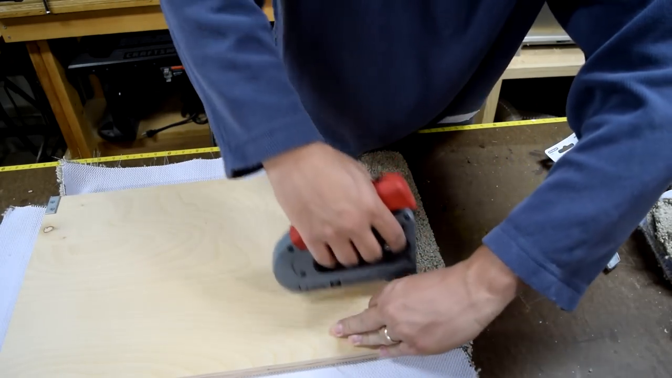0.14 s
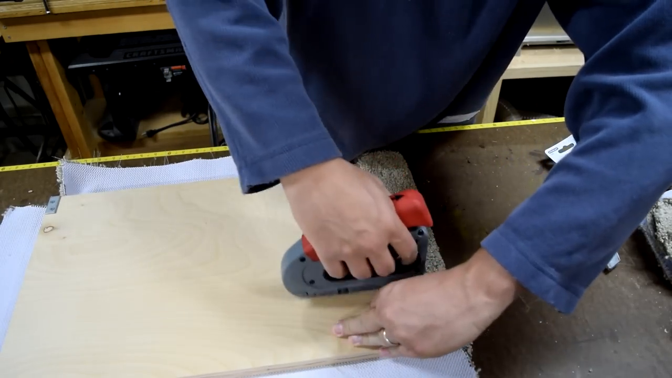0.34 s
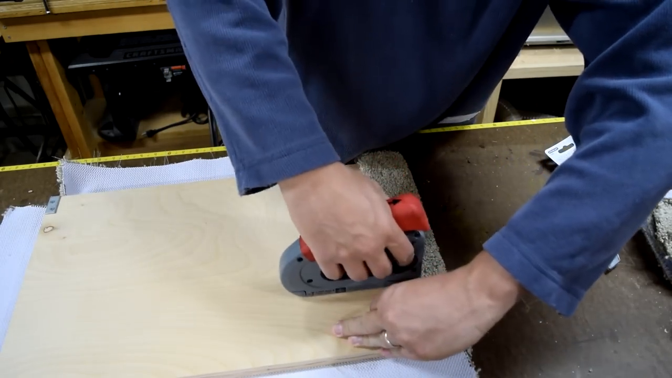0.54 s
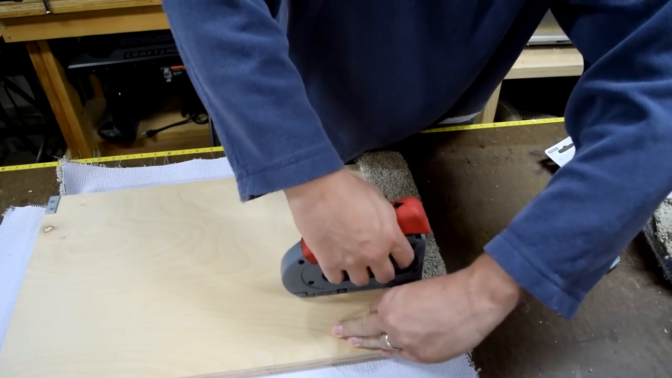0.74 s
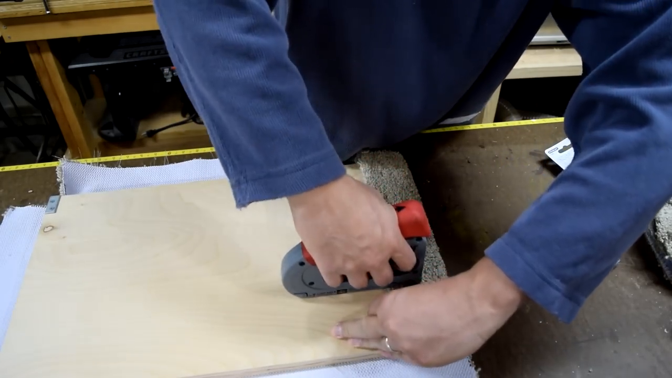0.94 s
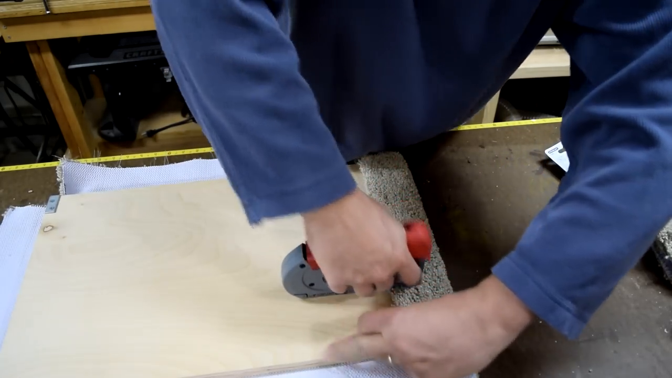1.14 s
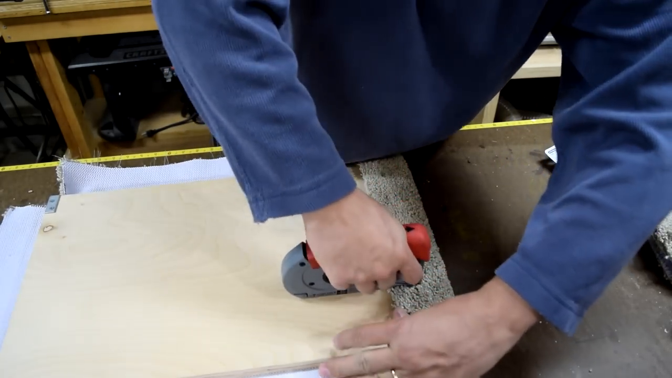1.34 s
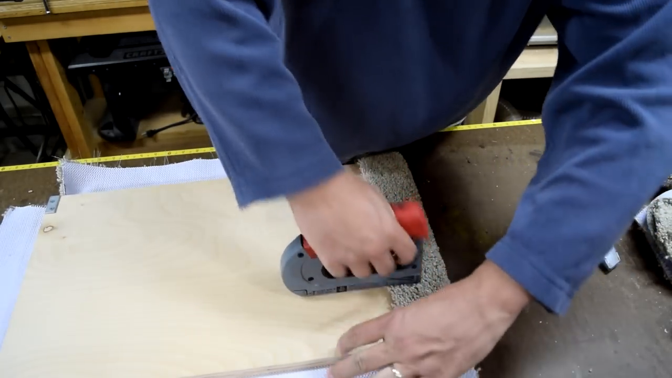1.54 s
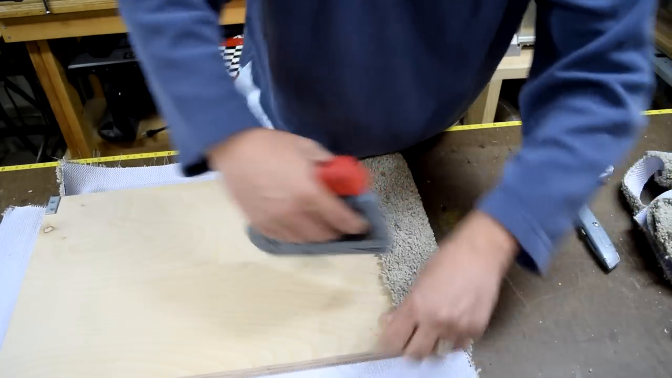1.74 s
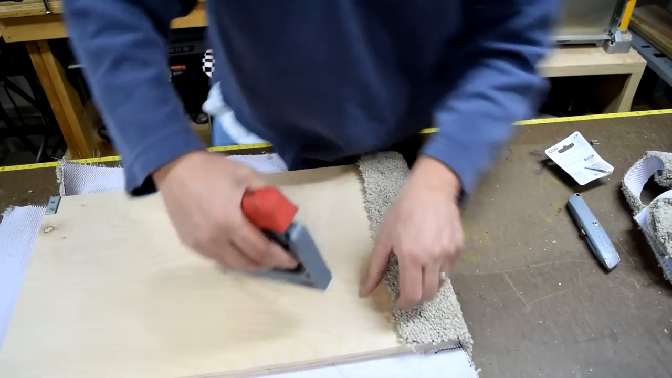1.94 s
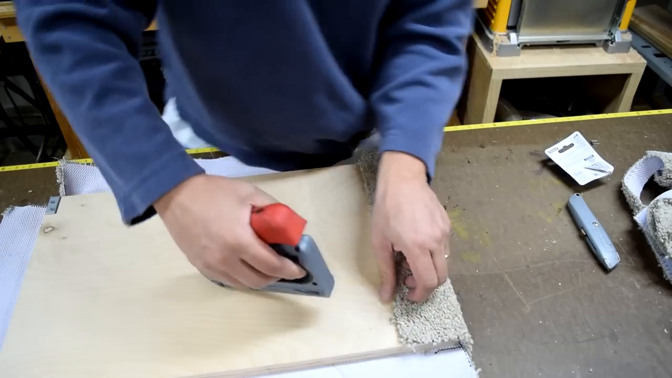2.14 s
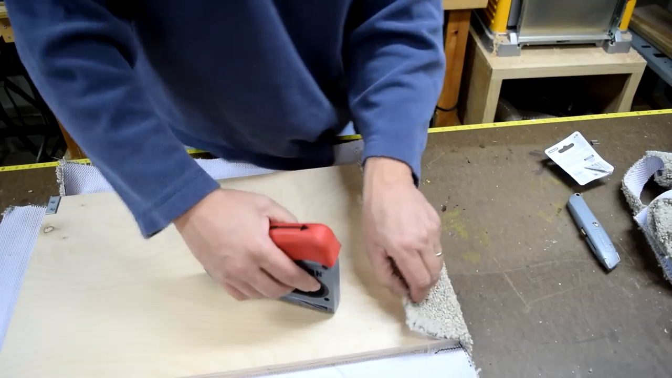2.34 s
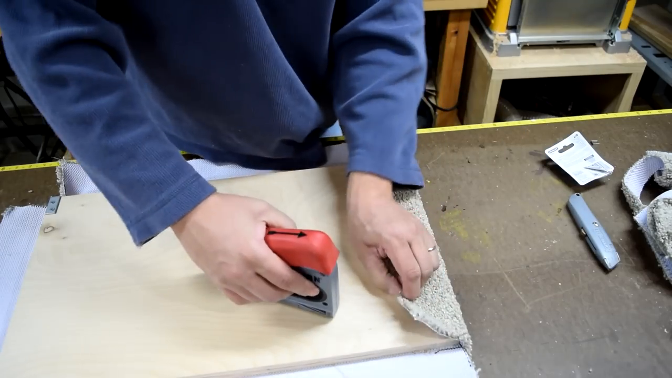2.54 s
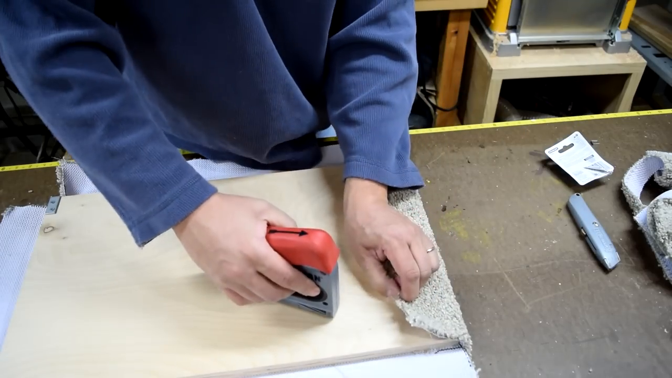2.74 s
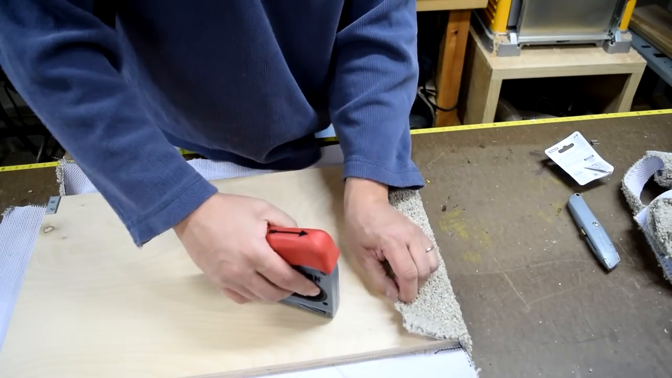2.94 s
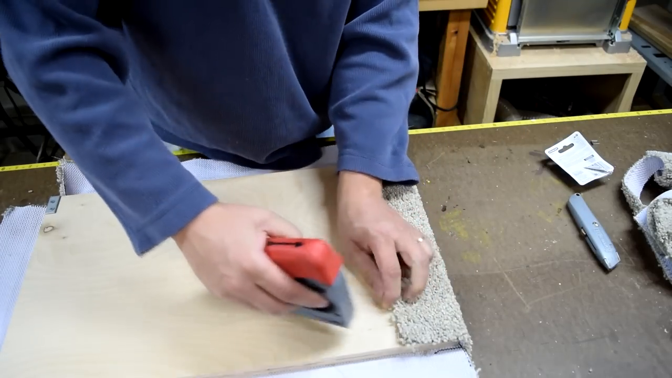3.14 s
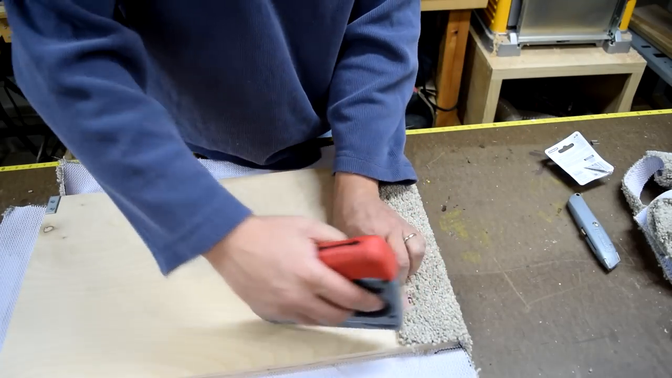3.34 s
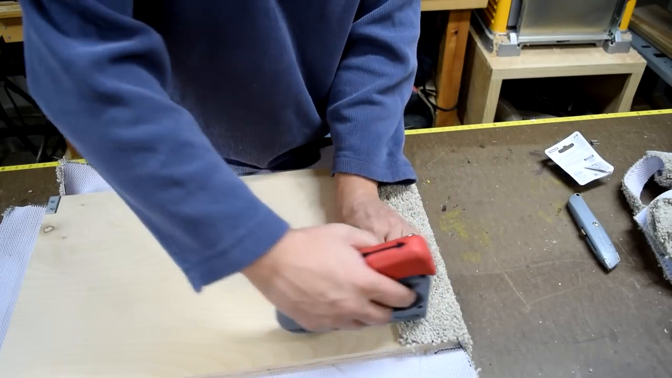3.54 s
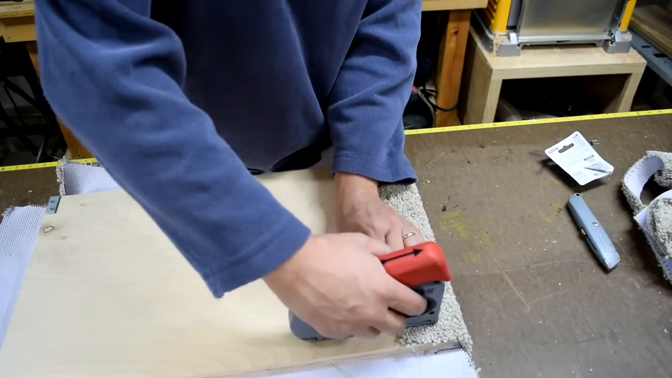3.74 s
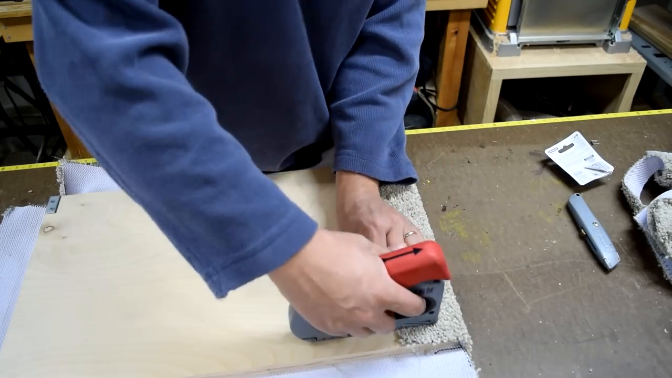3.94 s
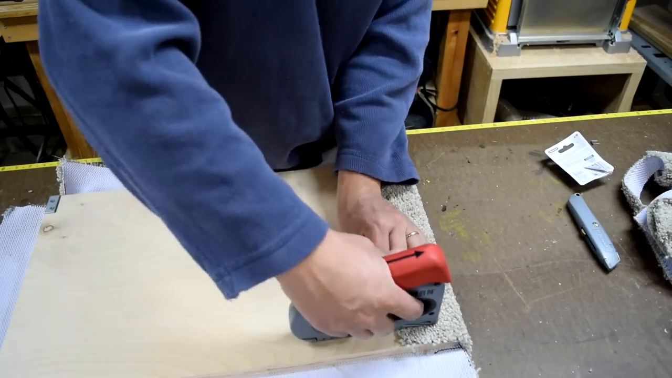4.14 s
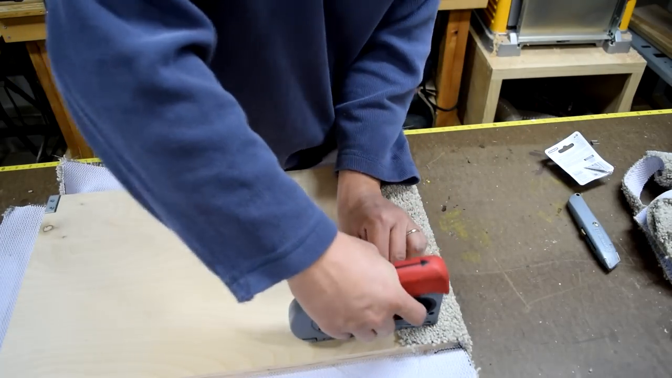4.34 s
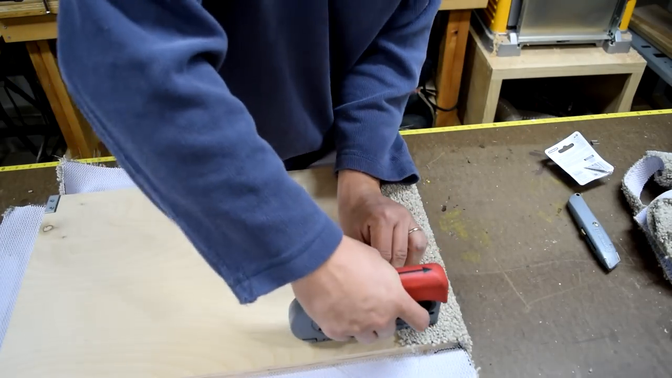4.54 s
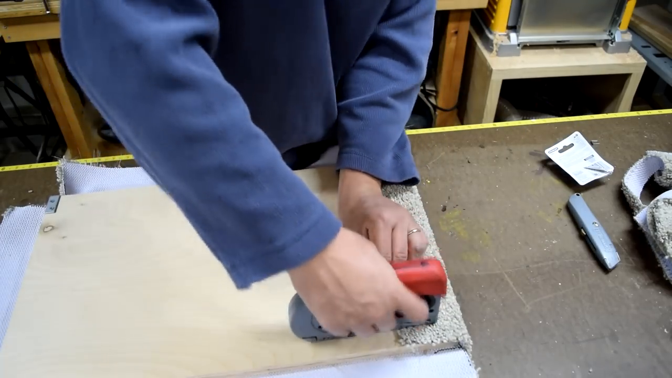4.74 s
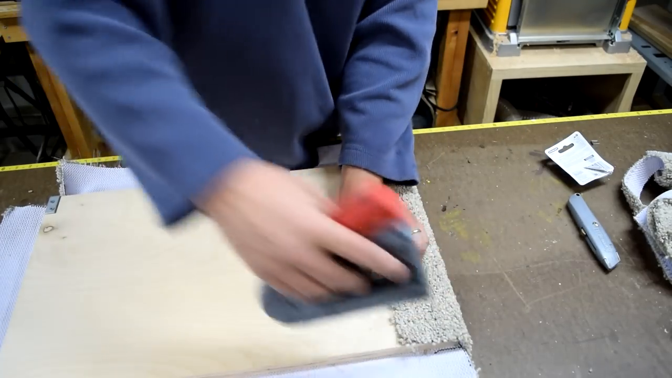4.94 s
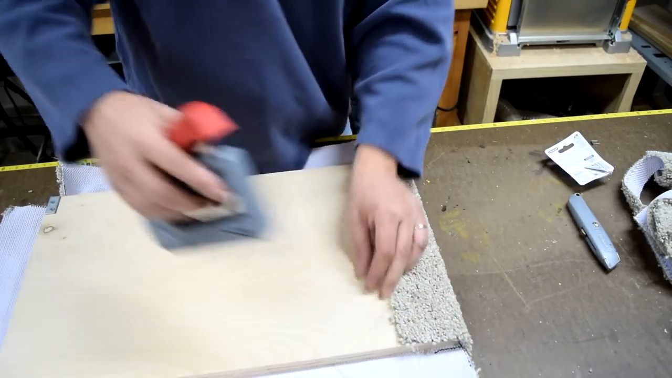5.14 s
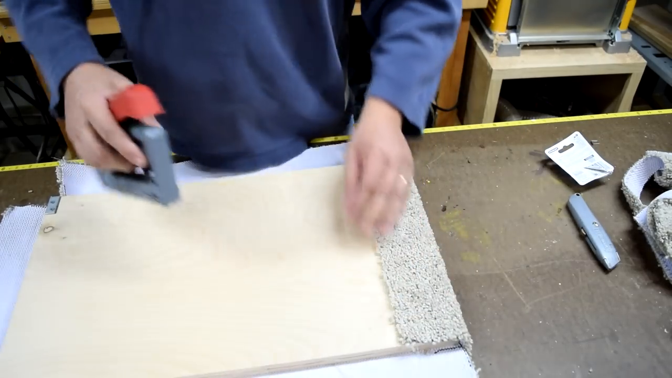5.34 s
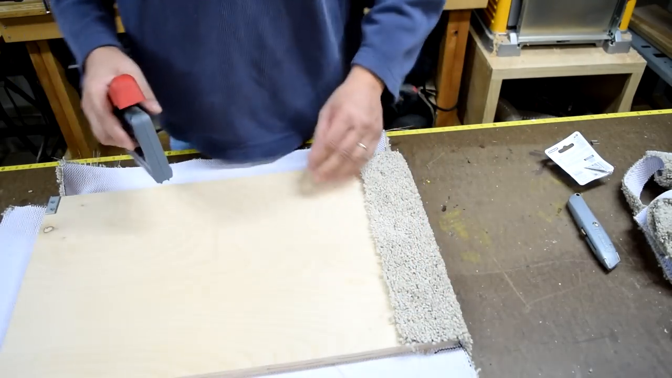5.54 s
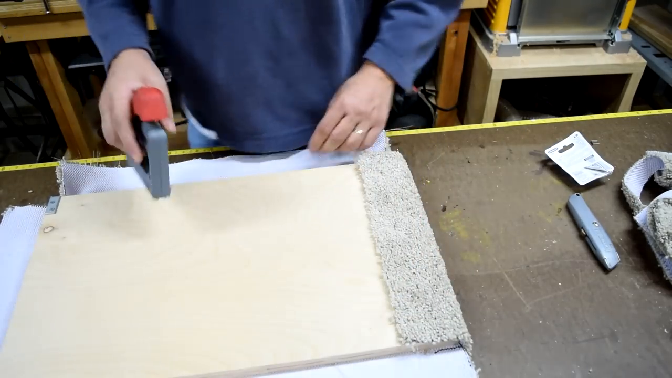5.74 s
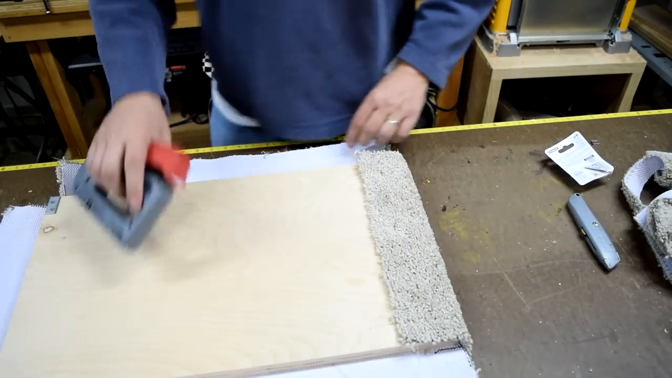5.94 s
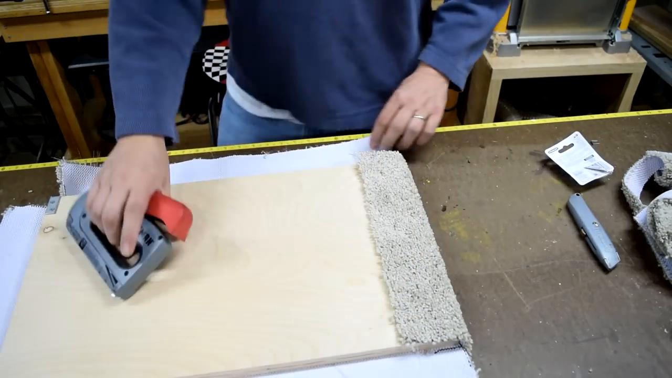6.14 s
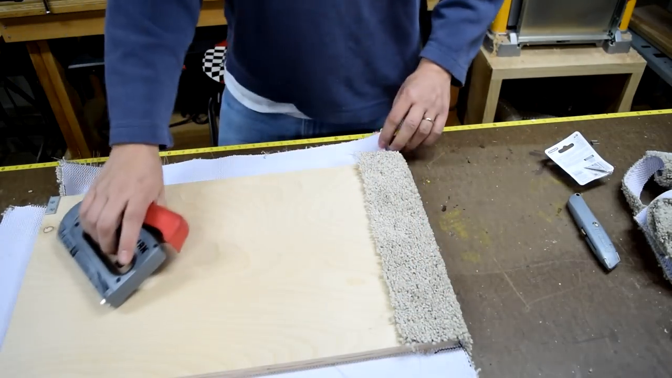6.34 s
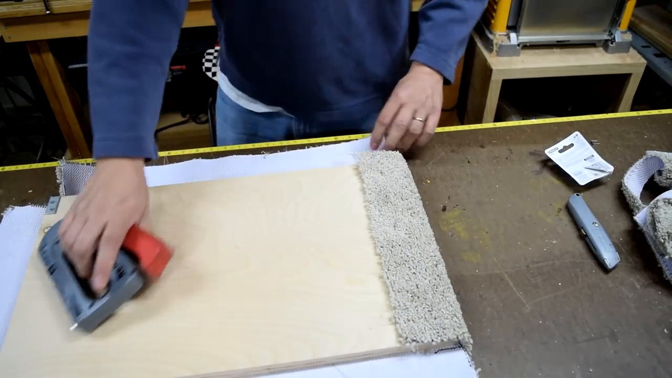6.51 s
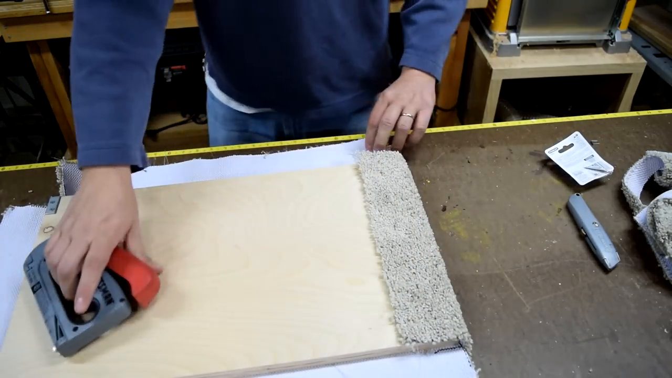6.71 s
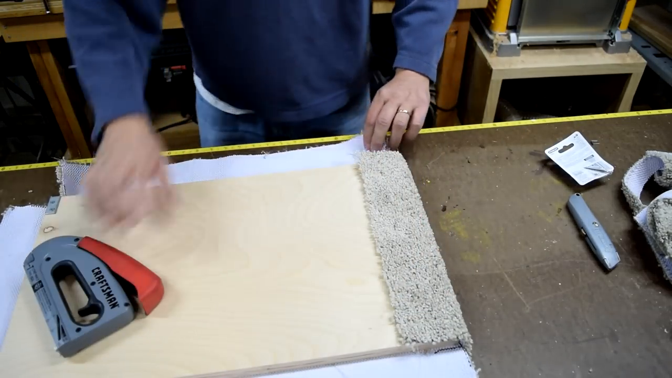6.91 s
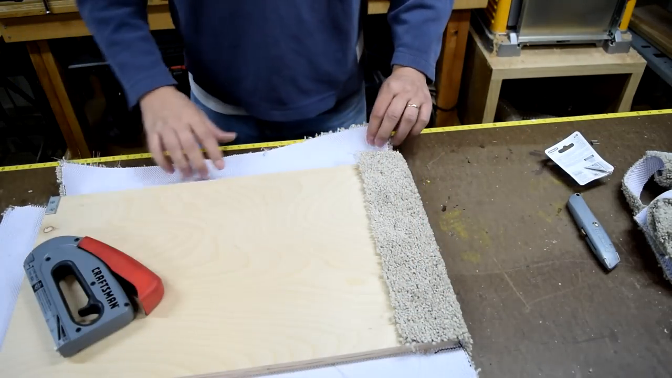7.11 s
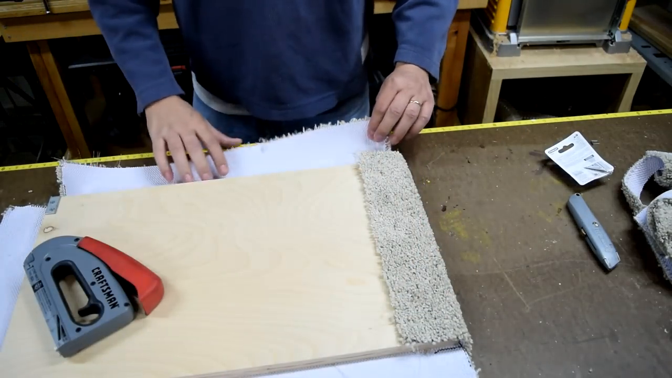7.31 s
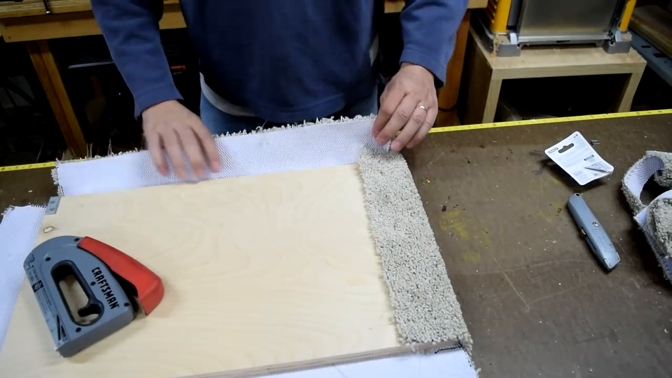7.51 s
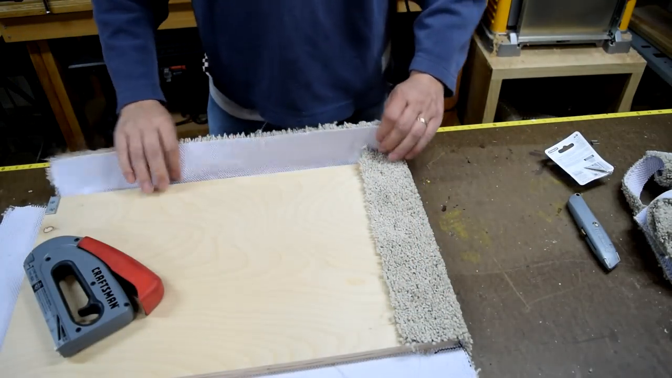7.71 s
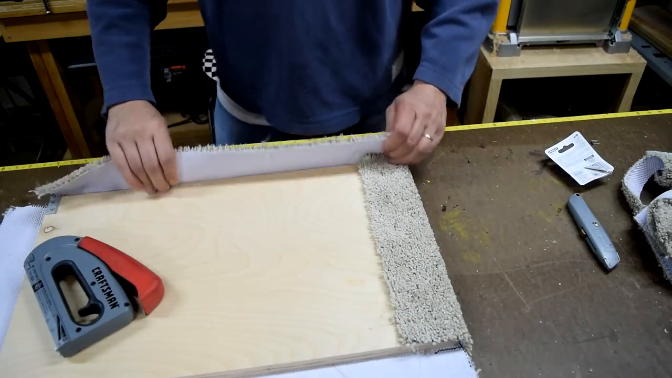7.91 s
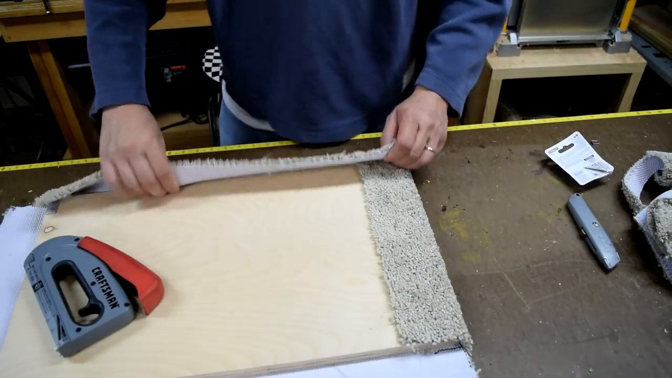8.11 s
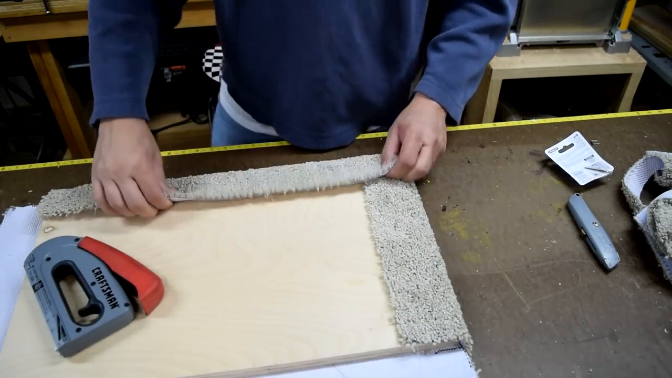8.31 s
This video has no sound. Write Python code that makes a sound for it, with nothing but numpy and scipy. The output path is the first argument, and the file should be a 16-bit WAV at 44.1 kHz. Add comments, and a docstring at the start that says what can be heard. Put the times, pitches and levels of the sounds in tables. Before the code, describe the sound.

On a workshop bench, close up, a hand staple gun clacks faintly, then slams a staple through carpet into plywood just after one second. Clacks and a hard knock follow. A cricket begins chirping at three seconds; a second bang comes past four, with bright handle snaps. Later the gun knocks and scrapes across the wood and is put down, leaving soft carpet rustle and chirps.

```python
"""A hand staple gun fastens carpet to a plywood board on a workshop bench, close to two microphones.
Over faint room noise, a room tail fades and sleeves and carpet rustle; the handle clacks, hands knock and press.
Two staples are fired, just after 1 s and 4 s: rattle and ringing over a dull low swing that stands in for the
bass of an overload; a limiter catches them late. From 3 s a cricket chirps with falling tones. After 6 s the gun
is knocked, slid and laid on the wood: board tones, scrapes and small slips. The room reflects these sounds."""
import sys
import numpy as np
from scipy import signal
from scipy.fft import rfft, irfft
from scipy.io import wavfile
from scipy.ndimage import uniform_filter1d

SR = 44100
rng = np.random.default_rng(int(sys.argv[2]) if len(sys.argv) > 2 else 0)


def wrap_up_sound(samples):
    """Save the sound to the file named by the first command line argument, as 16-bit audio."""
    columns = np.atleast_2d(samples).T
    # keep every value between -1 and 1, then stretch to whole-number steps
    tamed = np.clip(columns, -1, 1)
    steps = np.round(tamed * 32767).astype(np.int16)
    wavfile.write(sys.argv[1], SR, steps)


N = 369116  # length in samples


def amp(db):
    """Turns decibels into an amplitude factor."""
    return 10 ** (np.asarray(db) / 20)


def unit_rms(x):
    """Scales a steady sound to rms 1."""
    return x / np.sqrt(np.mean(x ** 2) + 1e-20)


def unit_blow(x):
    """Scales a blow to the energy of 10 ms at level 1."""
    return x / np.sqrt(np.sum(x ** 2) / (.01 * SR) + 1e-20)


def read(points, hz):
    """Reads a table of (Hz, value) along a log-frequency axis."""
    f, value = np.transpose(points)
    return np.interp(np.log(hz + 1), np.log(f + 1), value)


def add(mix, start, sound):
    """Adds a sound to the mix at a start time in seconds, cut off at the end."""
    part = mix[max(round(start * SR), 0):][:len(sound)]
    part += sound[:len(part)]


def bins(size):
    """Frequencies in Hz of the spectrum of a sound."""
    return np.fft.rfftfreq(size, 1 / SR)


def tint(x, colour):
    """Gives a steady sound a colour, at rms 1."""
    size = x.shape[-1]
    return unit_rms(irfft(rfft(x) * amp(read(colour, bins(size))), size))


# How alike the two microphone openings hear sound from all sides.
# Each row: frequency in Hz, correlation (1 = the same).
LIKENESS = [(100, 1), (500, 0.99), (1200, 0.99), (2200, 0.96), (4500, 0.77), (8000, 0.45), (14000, 0.65)]


def ports(pair):
    """Two unrelated signals become what two close microphone openings hear: less alike in the treble."""
    size = pair.shape[-1]
    same = np.clip(read(LIKENESS, bins(size)), 0, .999)
    mid, side = rfft(pair) * np.sqrt([(1 + same) / 2, (1 - same) / 2])
    return irfft([mid + side, mid - side], size)


# Colour of the steady room noise. Each row: frequency in Hz, relative level in dB per Hz.
AIR_COLOUR = [(20, -39.5), (45, -23.5), (80, -19), (120, -8), (160, -14), (400, -12), (1200, -11),
              (1600, -24.5), (2700, -12), (4500, -18.5), (12000, -28.5), (15500, -38.5)]


def air(air_db=-60, hum_db=-73, hum_hz=122):
    """Steady room noise, which is coloured random noise, and a faint mains hum, a single sine."""
    hum = amp(hum_db) * unit_rms(np.sin(2 * np.pi * hum_hz * np.arange(N) / SR))
    return amp(air_db) * tint(ports(rng.standard_normal((2, N))), AIR_COLOUR) + hum


def arch(start, length, speed_power=0.63):
    """Amplitude of one stroke: its speed rises and falls once, and loudness follows a power of it."""
    u = np.clip((np.arange(N) / SR - start) / length, 0, 1)
    return (4 * u * (1 - u)) ** speed_power


def wander(count=1500):
    """A slow random drift of rms about 1; more points make it quicker."""
    steps = unit_rms(uniform_filter1d(rng.standard_normal(count), size=25))
    return np.interp(np.linspace(0, count - 1, N), np.arange(count), steps)


def random_kicks(per_s, size_db, most):
    """Short kicks at random moments and signs; the spread of sizes in dB is capped at 'most' times size_db."""
    happens = rng.random(N) < per_s / SR
    sizes = amp(size_db * np.minimum(rng.exponential(1, N), most))
    return happens * rng.choice([-1, 1], N) * sizes


def friction(colour, grains_per_s=900, grain_db=3.5, smooth=1.0, catch_db=2.3):
    """Rubbing surfaces catch and let go in small grains over a smooth swish, with a level that wavers."""
    grains = unit_rms(random_kicks(grains_per_s, grain_db, most=5))
    uneven = amp(catch_db * wander(count=12000))
    return uneven * tint(grains + smooth * rng.standard_normal(N), colour)


# Strokes of sleeves, hands and carpet; two near 6.25 s are the gun scraping over the plywood,
# and the first row is the fading room tail of something just before the start.
# Each row: start in seconds, length in seconds, relative scrape level in dB, relative hiss level in dB.
STROKES = [(-.12, 0.24, -52, -61.5), (.97, 0.079, -53.5, -61.5), (1.03, 0.13, -38.5, -47),
           (1.829, 0.23, -52.5, -59), (1.973, 0.29, -49, -56.5), (2.82, 0.22, -56, -63),
           (2.968, .13, -45.5, -51.5), (3.638, .07, -44.5, -66), (3.705, 0.21, -53.5, -59.5),
           (4.208, 0.14, -42.5, -54), (5, 0.31, -50, -59), (5.35, 0.13, -48, -51), (5.47, 0.21, -53, -52.5),
           (5.985, 0.27, -51, -48.5), (6.236, .11, -38.5, -37.5), (6.247, .35, -43.5, -48),
           (6.553, 0.19, -52, -54.5), (7.09, 0.16, -67, -64.5), (7.397, 0.061, -51.5, -55),
           (7.662, 0.23, -57.5, -67), (7.893, 0.069, -51.5, -52), (7.994, 0.19, -56, -64.5),
           (8.159, 0.072, -51, -57), (8.239, .1, -44.5, -56.5)]
# Colours of the scrape and of the hiss. Each row: frequency in Hz, relative level in dB per Hz.
SCRAPE_COLOUR = [(50, -43.5), (110, -19), (500, -5), (850, -5), (1250, -1), (1850, -5), (2800, -15.5),
                 (6000, -49)]
HISS_COLOUR = [(1500, -16.5), (2800, 0), (4500, -4.5), (6300, -9.5), (8000, -18.5), (12000, -19.5),
               (15500, -32)]


def rubbing(idle_scrape_db=-64, idle_hiss_db=-81.5, idle_wander_db=2, scrape_db=-1):
    """Every row is an arch of scraping and hissing noise, over the faint stir of restless sleeves."""
    stir = amp(idle_wander_db * wander())
    scrape, hiss = amp(idle_scrape_db) * stir, amp(idle_hiss_db) * stir
    for start, length, stroke_scrape_db, stroke_hiss_db in STROKES:
        stroke = arch(start, length)
        # unrelated noises add by power
        scrape = np.hypot(scrape, amp(stroke_scrape_db) * stroke)
        hiss = np.hypot(hiss, amp(stroke_hiss_db) * stroke)
    return amp(scrape_db) * scrape * friction(SCRAPE_COLOUR) + hiss * friction(HISS_COLOUR)


def rattle(colour, treble_db, t60, size=8192, corner_hz=3500, rise=0.0015):
    """Parts chatter together briefly: a dense, fast-dying burst through a causal body filter."""
    t, hz = np.arange(size) / SR, bins(size)
    burst = rfft(rng.standard_normal(size) * (1 - np.exp(-t / rise)) * amp(-60 * t / t60))
    treble_lift = treble_db * hz ** 2 / (hz ** 2 + corner_hz ** 2)
    log_gain = np.log(amp(np.maximum(read(colour, hz), -80) + treble_lift))
    # hard contacts excite all pitches evenly
    log_gain -= np.log(uniform_filter1d(abs(burst) ** 2, size=13)) / 2
    # minimum phase: the filter answers only after the blow
    mirrored = np.r_[log_gain, log_gain[-2:0:-1]]
    body = np.exp(np.conj(signal.hilbert(mirrored)))[:len(hz)]
    return unit_blow(irfft(burst * body))


def ring(modes, size=12000, rise=0.001):
    """Damped tones set going by one blow, each dying at its own speed."""
    t = np.arange(size) / SR
    contact = 1 - np.exp(-(t / rise) ** 2)  # the blow is not instant
    tones = np.zeros(size)
    for hz, db, t60 in modes:
        tones += rng.choice([-1, 1]) * amp(db - 60 * t / t60) * np.sin(2 * np.pi * hz * t)
    return unit_blow(contact * tones)


# Ringing tones of the gun's housing.
# Each row: pitch in Hz, relative level in dB, time to die by 60 dB in seconds.
GUN_MODES = [(890, -5, 0.036), (919.4, -1, 0.063), (1255, -10, 0.17), (1920, -12, .06), (2406, -5.5, 0.04),
             (2908, -7.5, 0.087), (3940, -15.5, 0.071)]


def gun_ring(handle_hz=1660, handle_db=6):
    """The housing's tones and a close, well-damped pair of the handle, whose pitch depends on the grip."""
    pair = [(handle_hz, handle_db, .05), (handle_hz * 1.07, handle_db, .03)]
    return ring([*GUN_MODES, *pair])


# Handle and spring clacks. Each row: start in seconds, relative level in dB, extra treble in dB,
# time for the rattle to die by 60 dB in seconds, handle pitch under the grip in Hz, ring in dB beside the rattle.
CLACKS = [(0.493, -42.5, -7.5, 0.043, 1610, -5.5), (.512, -24, -6.5, 0.029, 1575, -2.5),
          (0.589, -34, -7, 0.02, 1580, -6), (1.088, -32, -3, 0.04, 1550, -15.5),
          (1.543, -22, 5.5, 0.09, 1620, -5), (1.568, -14.5, 3.5, 0.088, 1149, -3),
          (2.199, -19, -0.5, 0.048, 1634, 5), (2.977, -40, -3, 0.048, 1651, 4.5),
          (4.369, -10.5, 0.5, 0.056, 1640, -12), (4.763, -17, 1, 0.039, 1637, -2),
          (4.775, -6.5, 7.5, 0.076, 1680, -2), (5.808, -18.5, 4.5, 0.031, 1590, 1)]
# Colour of a clack's rattle. Each row: frequency in Hz, relative level in dB per Hz.
CLACK_COLOUR = [(100, -41), (480, -19), (700, -9.5), (900, -1), (1700, -2.5), (2200, -7.5), (3500, -9.5),
                (4700, -15.5), (8500, -26.5), (12500, -34), (15500, -44.5)]


def clacks():
    """The handle meets its stop: a rattle, and 1 ms later the housing rings briefly."""
    out = np.zeros(N)
    for start, db, treble_db, t60, handle_hz, ring_db in CLACKS:
        add(out, start, amp(db) * rattle(CLACK_COLOUR, treble_db, t60))
        add(out, start + 0.001015, amp(db + ring_db) * gun_ring(handle_hz))
    return out


# Ringing tones of the plywood board.
# Each row: pitch in Hz, relative level in dB, time to die by 60 dB in seconds.
BOARD_MODES = [(192, -5.5, 0.12), (241.2, -3.5, 0.072), (332.6, 2.5, 0.055), (420, -3, 0.052),
               (559.7, 2.5, 0.17), (650, -9.5, 0.16), (932.4, 8.5, 0.15), (1106, 4, 0.12), (1220, 8, 0.074)]


def board_ring(place_hz=None, octave_db=13):
    """The board rings; a given place favours tones near its pitch, losing octave_db per octave away."""
    if place_hz is None:
        return ring(BOARD_MODES)
    return ring([(hz, db - octave_db * abs(np.log2(hz / place_hz)), t60) for hz, db, t60 in BOARD_MODES])


# Gun and hands knock the board. Each row: start in seconds, relative level in dB, extra treble in dB,
# time for the rattle to die by 60 dB in seconds, board pitch favoured there in Hz,
# board ring in dB beside the rattle, gun ring in dB beside the rattle.
KNOCKS = [(0.541, -30.5, -39, .05, 209, -12, -18), (1.662, -36.5, -24, 0.028, 233, 1, -16.5),
          (1.979, -26.5, -1, 0.03, 240, 1.5, -5.5), (2.2593, -5, 2, 0.047, 332, -2.5, 0),
          (3.69, -35, -12.5, 0.068, 260, 2, 0.5), (4.077, -43.5, -26.5, 0.025, 400, 1.5, 1.5),
          (6.102, -17, -5, 0.059, 580, 0, -6.5), (6.152, -31.5, -9, 0.092, 200, -4.5, -17),
          (6.265, -40.5, 1, 0.024, 210.8, 0.5, -18), (6.711, -12, 2, 0.06, 576, 1, -8),
          (6.717, -12, -15, 0.15, 1200, 0, -6.5), (7.305, -55.5, -6.5, 0.057, 550, 8, -9),
          (7.438, -41.5, 2, 0.12, 550, -2.5, -25.5), (7.647, -46.5, -9, 0.018, 700, -4, -14),
          (7.971, -42, -8, .09, 550, -1.5, -9)]
# Colour of a knock's rattle. Each row: frequency in Hz, relative level in dB per Hz.
KNOCK_COLOUR = [(40, -38.5), (120, -23), (450, -15.5), (600, -8), (1100, -4.5), (1800, -5.5), (4200, -11),
                (6300, -18), (10400, -28), (15500, -39.5)]


def knocks():
    """The place of a blow decides which board tones answer; the gun rattles and rings on top."""
    out = np.zeros(N)
    for start, db, treble_db, t60, place_hz, board_db, gun_db in KNOCKS:
        add(out, start, amp(db) * rattle(KNOCK_COLOUR, treble_db, t60))
        add(out, start, amp(db + board_db) * board_ring(place_hz))
        add(out, start + 0.0012, amp(db + gun_db) * gun_ring())
    return out


# Fingers press the carpet down. Each row: start in seconds, length in seconds, relative level in dB.
PRESSES = [(0.74, 0.33, -50.5), (2.62, 0.3, -50.5), (3.15, 0.29, -58), (3.393, 0.22, -52.5)]
# Colour of the pressed carpet pile. Each row: frequency in Hz, relative level in dB per Hz.
PRESS_COLOUR = [(60, -28), (200, -13.5), (480, -0.5), (750, -4), (1100, -8.5), (1800, -7), (2800, -17),
                (6000, -41)]


def pressing():
    """Fingers press the carpet pile: a dull rub of catching fibres that swells and fades."""
    press = sum(amp(db) * arch(start, length) for start, length, db in PRESSES)
    return press * friction(PRESS_COLOUR)


def low_swing(width=0.0072, size=2000):
    """A dull low swing, out and back once, standing in for the bass of an overload; width in seconds."""
    u = np.arange(size) / SR / width
    return unit_blow(u * (2 - u) * np.exp(-u))


# Staples fired. Each row: start in seconds, relative level in dB, low swing in dB beside the rattle,
# extra treble in dB, time for the rattle to die by 60 dB in seconds.
SHOTS = [(1.110, 7, -24, 5.5, 0.036), (4.3775, 7, -27.5, 1.5, 0.038)]
# Colour of a shot's rattle. Each row: frequency in Hz, relative level in dB per Hz.
SHOT_COLOUR = [(100, -28.5), (220, -14.5), (340, -5), (750, 0.5), (1100, -2), (1700, 0), (2500, -2.5),
               (3200, -6.5), (4400, -7), (6400, -11.5), (7600, -19.5), (11500, -20.5), (15500, -38.5)]


def shots(ring_db=-17, board_db=-14):
    """The spring drives the blade down; gun and board ring, over a dull low swing."""
    out = np.zeros(N)
    for start, db, swing_db, treble_db, t60 in SHOTS:
        add(out, start, amp(db) * rattle(SHOT_COLOUR, treble_db, t60))
        add(out, start, amp(db + ring_db) * gun_ring())
        add(out, start, amp(db + board_db) * board_ring())
        add(out, start, amp(db + swing_db) * low_swing())
    return out


# Cricket chirps. Each row: start in seconds, count of wing strokes.
CHIRPS = [(3.072, 4), (3.433, 5), (3.774, 7), (4.171, 8), (4.598, 7), (5.048, 8), (5.474, 7), (5.88, 7),
          (6.293, 6), (6.682, 6), (7.085, 7), (7.589, 6)]
# the cricket warms up: its first chirps are quieter and lower, then it settles
SONG_DB, SONG_HZ, COLD_DB, COLD_HZ, WARM_UP_S = -34, 3396, -6, -160, 0.87
# once warm, a chirp's first stroke is softer and lower; every chirp swells
FIRST_STROKE_DB, FIRST_STROKE_HZ, SWELL_DB = -11.5, -130, 1
WING_PERIOD_S, STROKE_S = .027, .02


def cricket(jitter_hz=90, fall_hz=620, harmonics_db=(0, -26, -40, -37)):
    """Each wing stroke draws the scraper over uneven teeth: a tone that falls as the wing slows."""
    out, u = np.zeros(N), np.linspace(0, 1, int(STROKE_S * SR))
    for start, count in CHIRPS:
        cold = np.exp(-(start - CHIRPS[0][0]) / WARM_UP_S)
        for k in range(count):
            shy = np.exp(-2 * k) * (1 - cold)  # strongest on the first stroke
            teeth = unit_rms(uniform_filter1d(rng.standard_normal(len(u)), size=36))
            hz = SONG_HZ + COLD_HZ * cold + FIRST_STROKE_HZ * shy
            hz = hz + fall_hz * (.5 - u) + jitter_hz * teeth
            phase = 2 * np.pi * (np.cumsum(hz) / SR + rng.random())
            tone = sum(amp(db) * np.sin(h * phase) for h, db in enumerate(harmonics_db, 1))
            stroke = unit_rms(tone * signal.windows.tukey(len(u), .5))
            level_db = SONG_DB + COLD_DB * cold + FIRST_STROKE_DB * shy + SWELL_DB * (k / count - .5)
            add(out, start + k * WING_PERIOD_S, amp(level_db) * stroke)
    return out


def nook(x, spread=0.0017, count=8):
    """The cricket sits among shelves: a few close reflections, spread in seconds, follow each stroke."""
    taps = np.zeros(2000)
    delays = np.minimum(spread * rng.exponential(1, count), .03)
    taps[(delays * SR).astype(int)] = rng.choice([-.5, .5], count) / np.sqrt(count)
    taps[0] = 1  # the direct sound
    return signal.oaconvolve(x, taps / np.linalg.norm(taps))[:N]


# The gun is dragged over the plywood.
SLIDE_START_S, SLIDE_LENGTH_S, SLIDE_DB = 6.27, 0.36, -42.5


def sliding(slips_per_s=450, slip_db=4.5, sole_hz=1220, sole_width_hz=330, body_db=-6):
    """Small slips of the dragged gun excite a broad resonance of its sole and the ring of its housing."""
    slips = random_kicks(slips_per_s, slip_db, most=4)
    t = np.arange(2000) / SR
    sole = unit_blow(np.exp(-np.pi * sole_width_hz * t) * np.cos(2 * np.pi * sole_hz * t))
    sole_sound = signal.oaconvolve(slips, sole)[:N]
    housing_sound = amp(body_db) * signal.oaconvolve(slips, gun_ring())[:N]
    level = amp(SLIDE_DB) * arch(SLIDE_START_S, SLIDE_LENGTH_S)
    return level * unit_rms(sole_sound + housing_sound)


def scatter(x, corner_hz=6000, scatter_db=-9, delay=9):
    """Treble glancing off the body around the microphones arrives late (in samples), opposite in sign."""
    high_pass = signal.butter(2, corner_hz, "highpass", fs=SR, output="sos")
    glance = np.pad(signal.sosfilt(high_pass, x), (delay, 0))[:N]
    return amp(scatter_db) * np.array([[1], [-1]]) * glance


# How long the room rings. Each row: frequency in Hz, time to die by 60 dB in seconds.
ROOM_T60 = [(100, 0.15), (300, 0.51), (1000, 0.58), (2500, 0.6), (5000, 0.56), (9000, 0.48), (15000, 0.39)]


def room(x, build_up=0.0024):
    """Dense reflections from walls and shelves: noise in which each band dies at its own speed."""
    hz, t, noise = signal.stft(ports(rng.standard_normal((2, SR))), SR, nperseg=256)
    decay = amp(-60 * t / read(ROOM_T60, hz)[:, None])
    tail = signal.istft(noise * decay, SR, nperseg=256)[1]
    tail *= 1 - np.exp(-(np.arange(tail.shape[1]) / SR / build_up) ** 2)
    return signal.fftconvolve(x[None], tail / np.linalg.norm(tail[0]), axes=1)[:, :N]


def place(x, direct_db, room_db, pan_db):
    """Direct sound, a little to one side, plus the room."""
    direct = amp([[pan_db / 2], [-pan_db / 2]]) * x + scatter(x)
    return amp(direct_db) * direct + amp(room_db) * room(x)


def scene():
    """Room noise and all the sources, each kind with its own room share and side."""
    return (air()
            + place(rubbing() + pressing() + sliding(), direct_db=-3.0, room_db=-3.5, pan_db=3.0)
            + place(clacks(), direct_db=-1.5, room_db=-6.5, pan_db=0.46)
            + place(knocks(), direct_db=-2.5, room_db=-8.0, pan_db=0.7)
            + place(shots(), direct_db=-0.5, room_db=-1.5, pan_db=1.7)
            + place(nook(cricket()), direct_db=-3.0, room_db=-4.0, pan_db=2.5))


def record(dry, threshold_db=-5.5, recovery_db_per_s=130, attack=0.0063, strength=.72, cutoff_hz=15750):
    """A limiter reacts a moment late (attack in s), so loud onsets can clip; then the top treble is cut."""
    power = signal.lfilter(np.ones(256) / 256, 1, (dry ** 2).mean(0))
    # the sensed level jumps up at once and sinks at a steady rate
    fall = np.arange(N) * recovery_db_per_s / SR
    level_db = np.maximum.accumulate(10 * np.log10(power + 1e-12) + fall) - fall
    over_db = np.maximum(level_db - threshold_db, 0)
    lag = np.exp(-1 / (attack * SR))
    limited = dry * amp(-strength * signal.lfilter([1 - lag], [1, -lag], over_db))
    low_pass = signal.firwin(511, cutoff_hz, window=("kaiser", 8), fs=SR)
    return signal.oaconvolve(np.clip(limited, -1, 1), low_pass[None], "same")


dry = scene()
out = record(dry)
wrap_up_sound(out)
```